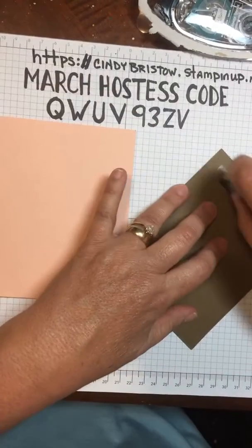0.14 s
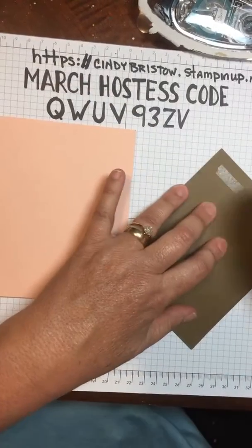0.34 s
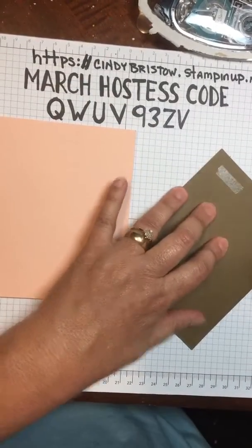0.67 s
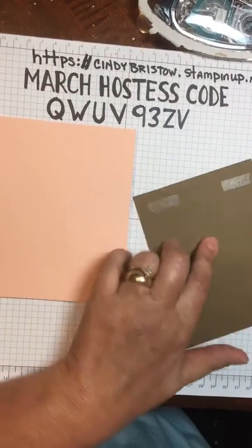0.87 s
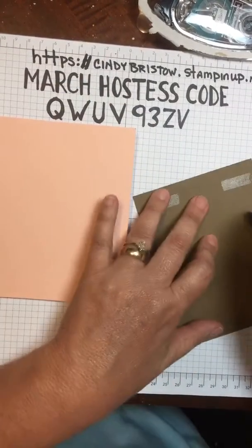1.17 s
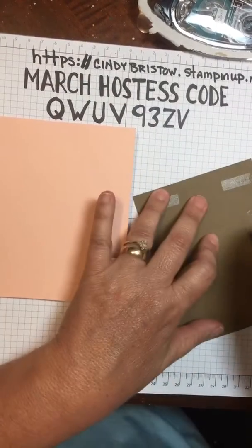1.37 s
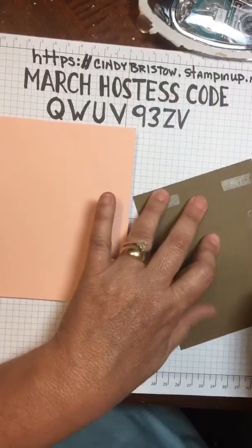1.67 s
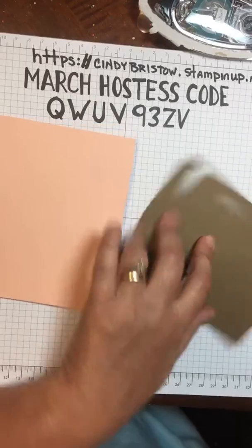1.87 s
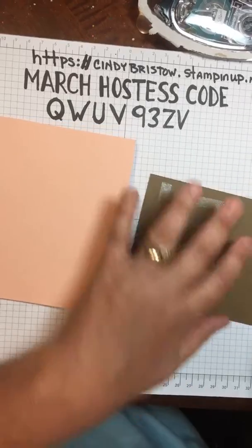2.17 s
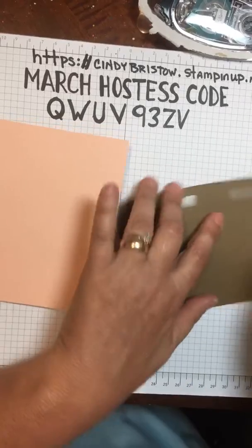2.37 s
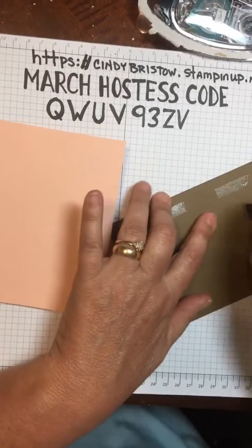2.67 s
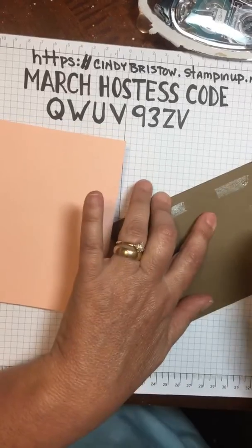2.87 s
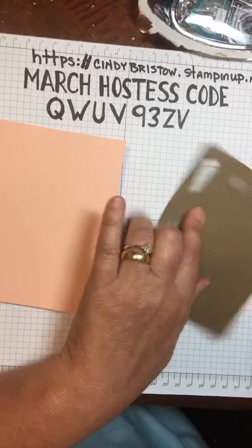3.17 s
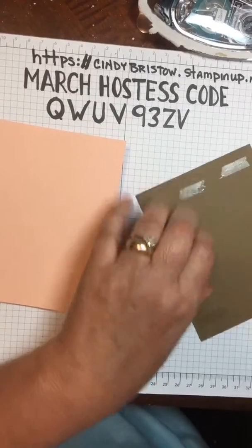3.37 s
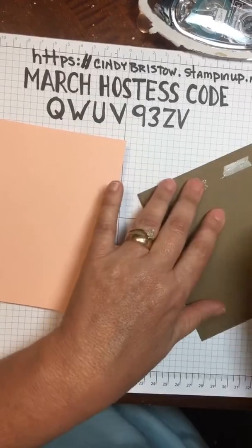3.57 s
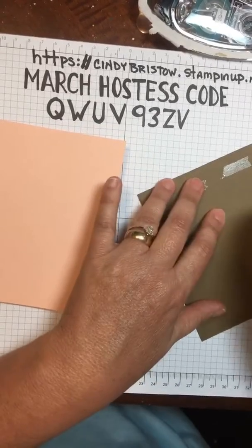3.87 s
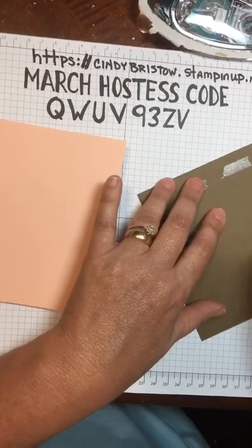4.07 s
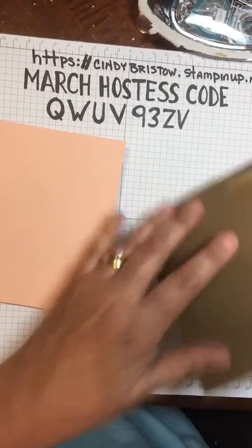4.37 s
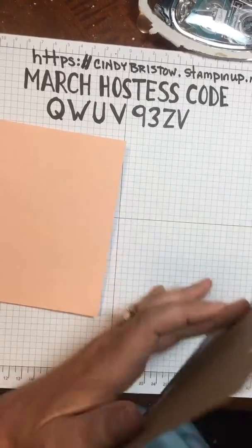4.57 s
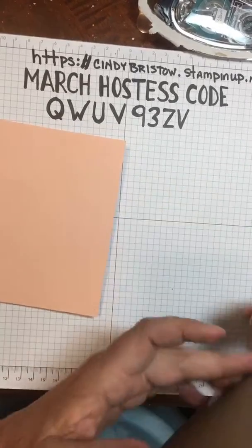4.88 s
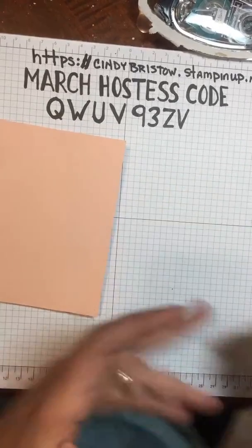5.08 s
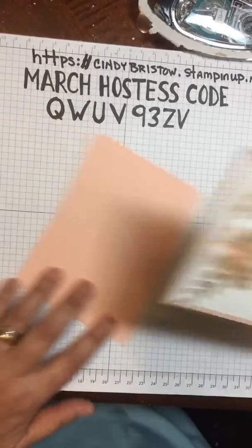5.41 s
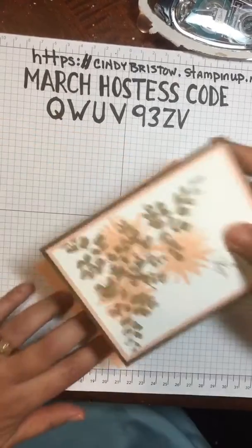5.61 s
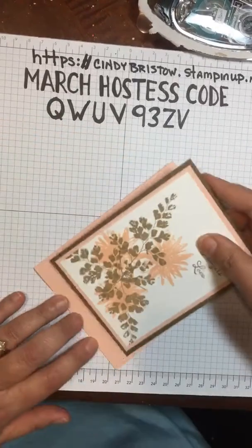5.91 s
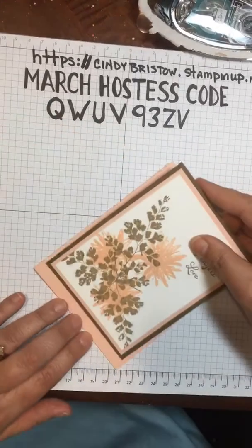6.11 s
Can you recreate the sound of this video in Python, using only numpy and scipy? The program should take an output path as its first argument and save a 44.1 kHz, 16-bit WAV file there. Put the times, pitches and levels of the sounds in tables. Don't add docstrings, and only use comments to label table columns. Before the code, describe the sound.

A small plastic tape runner zips across cardstock in eight short ratcheting strokes, then drops with a clatter and a card slaps down.

```python
import sys
import numpy as np
from scipy import signal
from scipy.fft import rfft, irfft
from scipy.io import wavfile
from scipy.ndimage import uniform_filter1d

SR = 44100
rng = np.random.default_rng(int(sys.argv[2]) if len(sys.argv) > 2 else 0)


def digitize_waveform(pressure):
    field = np.atleast_2d(pressure).T
    bounded = np.clip(field, -1, 1)
    quanta = np.round(bounded * 32767).astype(np.int16)
    wavfile.write(sys.argv[1], SR, quanta)


def attenuation_scalar(level_db):
    decades = np.asarray(level_db, float) / 20
    return 10 ** decades


N = 275625

# (frequency [Hz], width [Hz], level [dB])
SNAP_MODES = [(4850, 870, -2), (6300, 760, 0.5), (7830, 2900, -3), (10670, 1350, -3), (12700, 1500, -25.5),
              (15000, 1200, -9)]
# (frequency [Hz], width [Hz], level [dB])
SHELL_MODES = [(1170, 510, -11.5), (1383, 67, -3.5), (1486, 54, 1.5), (1700, 95, 1), (1995, 88, -5)]
# (frequency [Hz], width [Hz], level [dB])
PLATE_MODES = [(2540, 590, 0.5), (3240, 420, 4.5), (4010, 1800, -5.5), (4870, 450, 2.5)]
# (frequency [Hz], width [Hz], level [dB])
DESK_MODES = [(164.3, 49, -6), (242, 177, -9), (361.3, 117, -5.5), (517, 92, -7.5), (941, 160, -12)]


def rms_one(x):
    return x / np.sqrt(np.mean(x ** 2) + 1e-20)


def at_hz(points, hz):
    table_hz, values = np.transpose(points)
    return np.interp(np.log(np.maximum(hz, 1)), np.log(table_hz), values)


def coloured(x, spectrum):
    hz = np.arange(N // 2 + 1) * SR / N
    inside = (hz > spectrum[0][0]) & (hz < spectrum[-1][0])
    return rms_one(irfft(rfft(x) * attenuation_scalar(at_hz(spectrum, hz)) * inside, N))


def resonate(x, modes):
    out = 0
    for k, (hz, width, db) in enumerate(modes):
        r = np.exp(-np.pi * width / SR)
        b = [(1 - r * r) / 2, 0, (r * r - 1) / 2]
        a = [1, -2 * r * np.cos(2 * np.pi * hz / SR), r * r]
        out = out + (-1) ** k * attenuation_scalar(db) * signal.lfilter(b, a, x)
    return out


def flutter(rate_hz):
    r = np.exp(-2 * np.pi * rate_hz / SR)
    return rms_one(signal.lfilter([1], [1, -2 * r, r * r], rng.standard_normal(N + SR))[SR:])


def swells(rows):
    fall_db = 20
    rounding = 0.19
    t, power = np.arange(0, N + 64, 64) / SR, 0
    for s, rise, fall, *db in rows:
        away = np.where(t < s, (s - t) / max(rise, .005), (t - s) / max(fall, .005))
        sunk_db = fall_db * (np.hypot(away, rounding) - rounding)
        power = power + attenuation_scalar(2 * (np.array(db)[:, None] - sunk_db))
    return [np.interp(np.arange(N) / SR, t, np.sqrt(p)) for p in power]


def chatter(ms, size=1600):
    t = np.arange(size) / SR
    decay = np.exp(-(1000 * t / [[ms], [.15]]) ** 2.3) + 1.6 * np.exp(-t / .0003)
    decay[0] += .06 * np.exp(-t / .005)
    onset = 1 - np.exp(-t / .0001)
    return attenuation_scalar(4.2 * rng.standard_normal(size)) * onset * decay


def struck(envelope, modes, top_hz):
    out = 0
    for hz, width, db in modes:
        width = 1.5 * max(width, hz / 10.5)
        mode = [(hz, width, 0)]
        broad = [(hz, 1.3 * width, 0)]
        near, _ = envelope * rng.standard_normal(envelope.shape) + 1e-18
        click = (np.arange(len(near)) == 0) + 1e-18
        ring = np.array([resonate(resonate(near, mode), mode), resonate(click, broad)])
        ring = ring / np.sqrt(np.sum(ring ** 2, axis=1, keepdims=True))
        out = out + attenuation_scalar(db + 1.8 * rng.standard_normal()) * np.sqrt(width) * ring
    out = signal.sosfilt(signal.butter(2, top_hz, fs=SR, output="sos"), out)
    return out / np.sqrt(np.sum(out ** 2, axis=1, keepdims=True))


def small_body(x):
    return signal.sosfilt(signal.butter(4, 1010, "high", fs=SR, output="sos"), x)


def add(out, s, ring, db, beamed_db=0, span=88):
    i = int(s * SR)
    ring = attenuation_scalar(db) * ring / np.sqrt(np.max(uniform_filter1d(ring[0] ** 2, size=span)))
    out[:, i:i + ring.shape[1]] += ring * attenuation_scalar(np.array([[0], [-beamed_db]]))


def teeth():
    # (time [s], snap [dB], pawl pitch [Hz], shell [dB], chatter [ms])
    catches = [(0.1517, -23, 9250, -30, 1.5), (0.165, -25, 9450, -30.5, 1.2), (0.1775, -26, 9800, -30.5, 2.6),
               (0.1903, -28, 9400, -28.5, 3.7), (0.2037, -30, 9400, -39, 3.3),
               (0.2172, -26.5, 10000, -35, 3.9), (0.2325, -30, 9000, -32, 3.7),
               (0.2503, -26.5, 6150, -30.5, 5.6), (0.276, -26.5, 6400, -38, 3.5),
               (0.5463, -22.5, 6900, -32, 1.23), (0.5676, -21.5, 6940, -32.5, 2.3),
               (0.5812, -21, 7400, -28.5, 2.1), (0.5929, -24, 7100, -29, 4.2), (0.6042, -24, 7800, -32.5, 3),
               (0.6162, -22, 7700, -31, 1.8), (0.6308, -27.5, 7730, -35, 2.6),
               (0.6469, -27, 5770, -38.5, 3.2), (1.337, -28, 6400, -40.5, 2.4),
               (1.3569, -25, 6600, -31.5, 1.4), (1.371, -26.5, 6400, -28.5, 1.8),
               (1.383, -25.5, 6230, -32.5, 1.8), (1.3932, -28, 9350, -33, 1.7), (1.4036, -27, 8950, -32, 3.2),
               (1.415, -25, 8400, -37, 1.2), (1.428, -24, 8800, -36, 2.3), (1.6487, -21, 8800, -32, 1.3),
               (1.6722, -16, 9360, -30, 1.1), (1.6874, -24, 9100, -34.5, 1.2), (1.6998, -18, 9260, -31, 1.7),
               (1.711, -20, 9100, -38, 1.3), (1.7218, -22.5, 8830, -35, 0.72),
               (1.7313, -26, 9000, -28.5, 1.3), (1.7411, -23, 8530, -36, 1.7),
               (1.7515, -25, 7040, -37.5, 3.4), (1.7653, -25.5, 4600, -37, 2.05),
               (2.7359, -37.5, 5950, -28.5, 2.3), (2.768, -26, 5740, -30.5, 1.9),
            (2.7801, -25, 5260, -38, 1.6), (2.791, -29.5, 8400, -31, 4), (2.804, -25, 9500, -27.5, 2.4),
            (2.8186, -24, 9270, -37, 2.2), (2.8369, -24.5, 7020, -37.5, 2.3),
            (3.0053, -20.5, 8040, -36, 2.8), (3.0235, -23.5, 6500, -31.1, 4.1),
            (3.037, -23.5, 8260, -27.5, 3.8), (3.0482, -22, 6950, -41, 3.3), (3.06, -23.5, 8810, -38, 4.1),
            (3.0727, -21, 9300, -35, 2.4), (3.0853, -28, 6140, -32, 3.5), (3.1044, -25, 10100, -31.5, 1.9),
            (3.823, -46, 6430, -37, 2.4), (3.846, -25, 10660, -36, 2.0), (3.8606, -28, 9500, -34, 3.2),
            (3.8714, -25, 9700, -36, 2.2), (3.8828, -25, 9500, -37.5, 1.6), (3.8943, -24, 9500, -36, 0.99),
            (4.0494, -24.5, 5600, -31, 2.4), (4.0906, -25.5, 6400, -33.5, 2.4),
            (4.1063, -15, 9300, -30.5, 0.39), (4.1174, -22.5, 9150, -32.5, 1.2),
            (4.129, -21, 9200, -35, 1.8)]
    # (shell centre [Hz], purity of the snap [dB], plates [dB])
    grips = [(1380, 6, -37.5), (1300, 2, -32.5), (1370, 5.0, -42), (1340, 5, -34), (1490, -6, -31.5),
             (1520, 4, -32), (1590, -4, -30.5), (1490, 5, -33.5), (1530, -5, -34.5), (1720, 4.0, -31),
             (1670, 3.0, -32), (1680, 3, -30), (1620, 5, -36), (1610, 5, -30), (1890, 14, -33),
             (1790, 5, -33.5), (1850, -1, -35.5), (1580, 2, -36), (1410, 2.5, -31), (1470, 3, -31.5),
             (1650, 7, -33), (1500, 12, -33), (1510, 1, -45), (1580, 6, -34), (1550, 6, -38),
             (1690, 6.5, -34), (1630, 25, -32), (1690, 21, -31), (1690, 13.0, -34), (1640, 9, -38),
             (1660, 11, -32.5), (1660, -13, -31), (1660, 2, -42), (1690, 6, -35), (1540, 1, -30),
             (1500, 6.0, -40), (1570, 2, -32.5), (1640, 2, -31), (1700, 3, -33), (1820, -6, -32),
                 (1660, 0, -41), (1680, -1, -33.5), (1770, 0.5, -33), (1710, 8, -33.5), (1760, 6, -34.5),
                 (1590, 12, -37), (1780, 6, -31), (1810, 5.5, -35), (1740, 4, -32), (1760, -2, -33),
                 (1430, 5, -43), (1720, 2.5, -33), (1320, 3, -36), (1620, -1, -37.5), (1510, 5, -37),
                 (1800, 4.5, -43), (1670, 6, -39), (1720, 6, -34), (1770, 9, -30), (1820, 9, -32),
                 (1720, 11, -34.5)]
    return np.hstack([catches, grips])


def strokes():
    s = teeth()[:, 0]
    pause = np.diff(s) > .05
    return zip(s[np.r_[True, pause]], s[np.r_[pause, True]])


def grit(per_s, spread_db):
    sizes = attenuation_scalar(spread_db * np.minimum(rng.exponential(1, N), 4)) * rng.choice([-1, 1], N)
    return sizes * (rng.random(N) < per_s / SR) + 0.4 * rng.standard_normal(N)


def slides():
    # (peak time [s], rise [s], fall [s], hiss [dB], rasp re hiss [dB])
    pushes = [(0.0, .1, 0.31, -71.5, 7), (.76, 0.3, 0.15, -63.5, -5), (.873, 0.15, 0.068, -51.5, -9),
              (1.028, 0.048, 0.017, -70, 2), (1.86, 0.047, 0.13, -64.5, -0.5),
              (1.935, 0.15, 0.062, -47.5, -13.5), (2.08, 0.15, 0.034, -59.5, -3),
              (2.28, .04, 0.9, -78, -32), (2.36, 0.12, 0.34, -68, -6), (2.437, 0.23, 0.048, -55.5, -5.5),
              (3.19, 0.25, 0.17, -54, -16), (3.28, 0.17, 0.082, -52, -5), (3.519, 0.015, 0.043, -69, 2),
              (4.25, 0.1, 0.057, -64.5, -4.5), (4.86, 1, 0.19, -66.5, 0.5), (5.021, 0.077, 0.12, -62, -3),
              (5.24, 0.29, 0.092, -68.5, 10.5), (5.298, 0.067, 0.11, -57.5, -1),
              (5.37, 0.0091, 0.21, -49, -11), (5.44, 0.091, 0.11, -43, -11.5), (5.6, 0.064, 0.51, -73.5, 2),
              (5.818, 0.23, 0.14, -60.5, -9), (5.95, .2, 0.47, -74, -8), (6.141, 0.13, 0.052, -65, -12)]
    # (frequency [Hz], level per Hz [dB])
    hiss_spectrum = [(2240, -21), (3800, -14), (6060, -5.5), (6650, -5), (11300, -3.5), (13300, -17.5),
                     (15800, -14.5), (16200, -37), (16500, -51)]
    # (frequency [Hz], level per Hz [dB])
    rasp_spectrum = [(350, -48), (600, -2.5), (818, -10), (1140, -1), (2120, -3.5), (3030, -3), (3810, -12),
                     (4200, -21), (5460, -20), (9240, -120)]
    # (peak time [s], rise [s], fall [s], rumble [dB])
    leans = [
        (.908, 0.16, 0.21, -64),
        (1.985, 0.22, 0.011, -60),
        (2.095, 0.12, 0.012, -60.5),
        (2.3, 0.078, .2, -68),
        (2.45, 0.18, 0.12, -65.5),
        (3.03, 0.069, 0.3, -59.5),
        (3.293, 0.12, 0.093, -60),
        (5.08, 0.99, 0.55, -68),
        (5.338, 0.6, 0.11, -70),
        (5.502, 0.12, 0.12, -64),
    ]
    roller_db = [-59, -57.5, -54.5, -56, -61, -65, -54.5, -57.5]
    rest_rasp_db, rest_rumble_db = -78.5, -82

    hiss, rasp = swells([(*row[:4], row[3] + row[4]) for row in pushes])
    fibres = grit(2500, spread_db=1.0) * attenuation_scalar(1.2 * flutter(43))
    paper = hiss * coloured(fibres, hiss_spectrum)
    paper = paper + np.hypot(rasp, attenuation_scalar(rest_rasp_db)) * coloured(fibres, rasp_spectrum)
    loads = [(end, 1.44 * (end - start), 0.06, db) for (start, end), db in zip(strokes(), roller_db)]
    press, = swells(leans + loads)
    rumble = rms_one(resonate(grit(150, spread_db=7.0), DESK_MODES))
    return paper + np.hypot(press, attenuation_scalar(rest_rumble_db)) * rumble


def contacts():
    # (time [s], snap [dB], shell [dB], thump [dB])
    setdowns = [(0.105, -58, -47, -74), (.113, -55, -45, -69), (.126, -45, -66, -62), (.144, -53, -64, -57),
                (.483, -59.5, -53.5, -57.5), (1.315, -58, -69, -82), (1.603, -61, -56, -50),
                (1.64, -56, -60, -75), (1.793, -62, -45.5, -74), (2.682, -70, -52, -56.5),
                (2.701, -54, -46.5, -74), (2.709, -51.5, -38, -64), (2.969, -43, -41, -42),
                (3.777, -68, -56.5, -58), (3.795, -52, -49.5, -75), (3.906, -46, -42, -60),
                (4.047, -55, -46, -39)]
    # (time [s], snap [dB], shell [dB], thump [dB], thump pitch [Hz])
    touches = [(1.024, -50, -61, -59, 185), (1.17, -57, -62, -62, 425), (1.254, -76, -63, -62.5, 404),
               (1.931, -54, -48.5, -61, 200), (1.972, -72, -54.5, -48.5, 368), (2.085, -78, -64, -56, 518),
               (2.271, -53, -56.5, -57.5, 218), (2.392, -66, -59, -58, 323), (2.609, -61, -88, -73, 390),
               (3.507, -56, -57, -62, 186), (3.519, -51, -66, -64, 372), (4.316, -52.5, -62, -77, 128),
               (4.474, -69, -54, -86, 475), (5.205, -54.5, -63, -72, 210), (5.715, -58, -72, -59, 194),
               (5.814, -68, -63, -58.5, 626)]
    # (time [s], snap [dB], shell [dB], plates [dB], thump [dB])
    knocks = [(4.488, -22, -28, -26.5, -45), (4.549, -39, -21.5, -27, -32.5), (4.556, -28, -48, -32, -46.5),
              (4.644, -33.5, -38, -32, -57), (4.655, -37.5, -38, -47, -45), (4.729, -40.5, -33, -36, -48),
              (4.892, -78, -49, -57, -57), (5.038, -26.5, -36.5, -29, -33.5), (5.349, -52, -50, -47, -60),
              (5.361, -65, -60, -46, -45.5), (5.49, -61, -68, -47, -55), (5.578, -56, -52, -47.5, -60)]
    rows = [(s, snap, shell, (snap + shell) / 2 + 3, thump, 392) for s, snap, shell, thump in setdowns]
    rows += [(s, snap, shell, (snap + shell) / 2 - 3.5, thump, hz) for s, snap, shell, thump, hz in touches]
    return rows + [(*row, 361.3) for row in knocks]


def taps():
    housing, desk = np.zeros((2, 2, N))
    push = np.tile(np.pad(np.hanning(50), (0, 2550)), (2, 1)) + 1e-18
    snap_modes = SNAP_MODES[:5] + [(9100, 3100, 2.4)]
    shell_modes = [(1104, 310, -0.87)] + SHELL_MODES
    plate_modes = [(2290, 540, -0.5)] + PLATE_MODES
    for s, snap_db, shell_db, plates_db, thump_db, hz in contacts():
        contact = chatter(3.46)
        add(housing, s, struck(contact, snap_modes, 14400), snap_db)
        add(housing, s, struck(contact, shell_modes, 1800), shell_db)
        add(housing, s, struck(contact, plate_modes, 3460), plates_db, beamed_db=0.5)
        thump = resonate(push, sorted(DESK_MODES + [(hz, 60, 7.0)]))
        add(desk, s, thump, thump_db, beamed_db=3.5, span=260)
    return small_body(housing) + desk


def squeaks():
    # (time [s], frequency [Hz], peak level [dB], length [ms])
    chirps = [
        (.110, 1450, -35, 12),
        (2.705, 1530, -37.5, 12),
        (1.3255, 3300, -46, 5.4),
    ]
    out = np.zeros((2, N))
    for s, hz, db, ms in chirps:
        t = np.arange(int(ms * SR / 1000)) / SR
        i = int(s * SR)
        swell = np.sin(np.pi * t / t[-1]) ** 2
        out[:, i:i + len(t)] += attenuation_scalar(db) * swell * np.sin(2 * np.pi * hz * t)
    return out


def ratchet():
    out = np.zeros((2, N))
    for s, snap_db, hz, shell_db, ms, grip_hz, purity_db, plates_db in teeth():
        shell_modes = [(f * grip_hz / 1600, width + 140, db) for f, width, db in SHELL_MODES]
        shell_modes += [(0.926 * grip_hz, 300, 5.5)]
        snap_modes = SNAP_MODES + [(hz, 1300, 1.78 * purity_db - 2.5), (9000, 1500, -1.5)]
        snap = struck(chatter(1.25 * ms), snap_modes, 17000)
        shell = struck(chatter(0.57 * ms), shell_modes, 3600)
        plates = struck(chatter(2.5 * ms), PLATE_MODES, 4860)
        add(out, s, snap, snap_db - .3, beamed_db=3.0 + 0.39 * (snap_db + 26.5))
        add(out, s, shell, shell_db - .3, beamed_db=3.5)
        add(out, s, plates, plates_db - 1.5, beamed_db=2.5)
    return small_body(out)


def ticks():
    # (time [s], level [dB])
    cracks = [(0.994, -57), (1.0235, -52), (1.099, -62), (1.1713, -52), (1.229, -57), (4.4888, -15.5),
              (4.4918, -36), (5.035, -46), (5.0388, -25), (5.0398, -28), (5.2065, -54), (5.349, -39),
              (5.349, -40), (5.3516, -40), (5.362, -51), (5.5788, -39), (5.716, -47)]
    out, t = np.zeros((2, N)), np.arange(300) / SR
    sos = signal.butter(2, [1200, 12600], "band", fs=SR, output="sos")
    for s, db in cracks:
        crack = np.exp(-1000 * t / 0.37) * rng.standard_normal(len(t))
        crack[0] = -3
        add(out, s, np.tile(signal.sosfilt(sos, crack), (2, 1)), db, beamed_db=-1.0, span=30)
    return out


def panel():
    # (frequency [Hz], width [Hz], level [dB])
    panel_mode = [(868.6, 15, 0)]
    # (time [s], ring level [dB])
    releases = [
        (1.755, -60),
        (3.9, -62),
        (4.05, -64),
        (4.115, -57),
    ]
    out = np.zeros((2, N))
    push = np.tile(np.pad(np.hanning(40), (0, 9000)), (2, 1))
    for s, db in releases:
        add(out, s, resonate(resonate(push, [(835, 39, 0)]), panel_mode), db, beamed_db=-5, span=260)
    return out


def landing():
    # (frequency [Hz], level [dB], decay by 60 dB [s])
    free_modes = [(1180, -19, 0.11), (1292, 7, 0.079), (1457, -5, 0.088), (1647, -4, 0.2)]
    out, t = np.zeros((2, N)), np.arange(9000) / SR
    ring = sum(attenuation_scalar(db - 60 * t / t60) * np.sin(2 * np.pi * hz * t) for hz, db, t60 in free_modes)
    ring = ring * (1 - np.exp(-t / 0.001))
    add(out, 4.550, np.tile(ring, (2, 1)), -29.5, beamed_db=3.0)
    return out


def in_time(span, fade_s=.04):
    before = (span[0][0] - fade_s, -110, *span[0][2:])
    after = (span[-1][0] + fade_s, -110, *span[-1][2:])
    s, *columns = np.transpose([before, *span, after])
    return [np.interp(np.arange(N) / SR, s, c) for c in columns]


def hum(modes, stretch=1):
    out = 0
    for hz, wander_hz, db in modes:
        level = attenuation_scalar(db + 3.2 * flutter(36))
        pitch = hz * stretch + wander_hz * flutter(50.3)
        out = out + level * np.sin(2 * np.pi * np.cumsum(pitch) / SR)
    return rms_one(out)


def rocking():
    # (time [s], low hum [dB], upper hum [dB], pitch [Hz])
    rolls = [
        (4.6, -60, -76, 351.8),
        (4.64, -58, -60, 350.6),
        (4.665, -49, -48, 373),
        (4.72, -50, -57, 375.2),
        (4.8, -49, -51.5, 369.7),
        (4.86, -50.5, -65, 387),
        (4.93, -60, -91, 392),
        (4.97, -66, -89.5, 390),
        (5.02, -72, -89, 396),
    ]
    low_db, upper_db, hz = in_time(rolls)
    low = hum([(327, 19.6, -9), (387, 8.2, -4.0), (570, 55, -16.5)], stretch=hz / 385)
    upper = hum([(850, 82.0, -9.5), (1000, 16, 1.0), (1210, 100, -5)])
    return attenuation_scalar(low_db) * (low + attenuation_scalar(upper_db - np.maximum(low_db, -70)) * upper)


def slap():
    # (frequency [Hz], width [Hz], level [dB])
    body = [(235, 134, 17), (338, 128, 20.5), (1080, 270, 15), (3200, 190, 2)]
    slap_s = 5.0385
    out, burst = np.zeros((2, N)), chatter(1.9)
    burst = burst[[0, 0]] * rng.choice([-1, 1], burst.shape[1])
    burst[:, 20:26] = attenuation_scalar(-14) * np.max(burst) / 2
    burst[1] = np.linalg.norm(burst[0]) * (np.arange(burst.shape[1]) == 20)
    sos = signal.butter(2, [140, 7260], "band", fs=SR, output="sos")
    add(out, slap_s, signal.sosfilt(sos, burst), -19, beamed_db=20)
    push = np.tile(np.pad(np.hanning(12), (20, 2000)), (2, 1))
    add(out, slap_s, resonate(push + 1e-18, body), -25, beamed_db=5.0)
    return out


def room(x, size=20000):
    # (frequency [Hz], time [s])
    decay_s = [(150, 0.13), (1500, 0.17), (4000, 0.25), (9000, 0.12), (15000, 0.14)]
    t, tail = np.arange(size) / SR, 0
    for hz in 100 * 2 ** np.arange(0, 7.5, .5):
        sos = signal.butter(2, [hz * 2 ** -.25, hz * 2 ** 0.3], "band", fs=SR, output="sos")
        band = signal.sosfilt(sos, rng.standard_normal(size))
        tail = tail + band * attenuation_scalar(-60 * t / at_hz(decay_s, hz))
    tail = tail * np.clip(t / .002 - 1, 0, 1)
    return attenuation_scalar(-3) * signal.fftconvolve(x, tail / np.sqrt(np.sum(tail ** 2)))[:N]


def scene():
    # (frequency [Hz], level per Hz [dB])
    air_spectrum = [(15, -55.5), (25, -37), (58, -22), (131, 4), (202, 3), (368, 0), (878, -6.5),
                    (2150, -11.5), (3230, -10.5), (4020, -12), (10100, -11), (15200, -21), (16500, -23)]
    near, radiated = ratchet() + taps() + squeaks() + slap() + panel() + ticks() + landing()
    desk = near + room(radiated) + slides() + rocking()
    desk = signal.sosfilt(signal.butter(2, 100, "high", fs=SR, output="sos"), desk)
    mono = desk + attenuation_scalar(-69) * coloured(rng.standard_normal(N), air_spectrum)
    return np.array([mono, mono])


def band_limit(x):
    return signal.sosfilt(signal.butter(12, 16970, fs=SR, output="sos"), x)


def record(dry):
    mix = signal.sosfilt(signal.cheby2(10, 60, 17300, fs=SR, output="sos"), dry)
    return band_limit(mix)


dry = scene()
out = record(dry)
digitize_waveform(out)
```